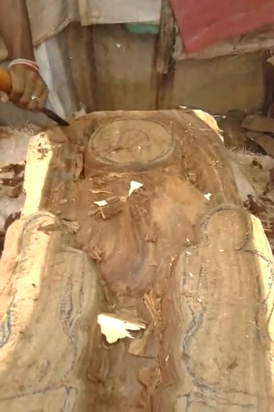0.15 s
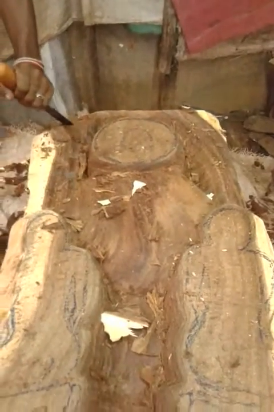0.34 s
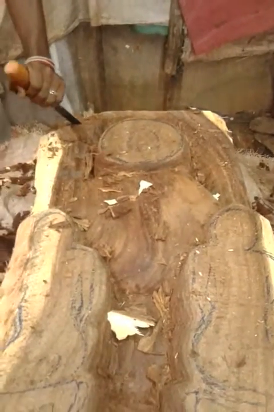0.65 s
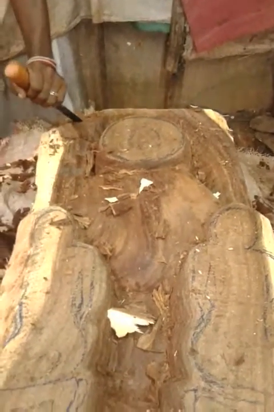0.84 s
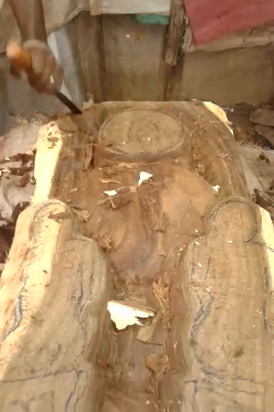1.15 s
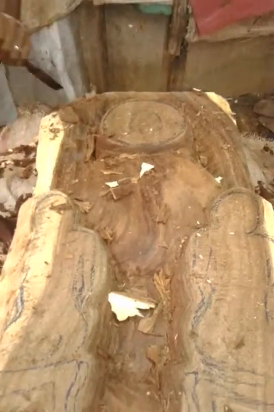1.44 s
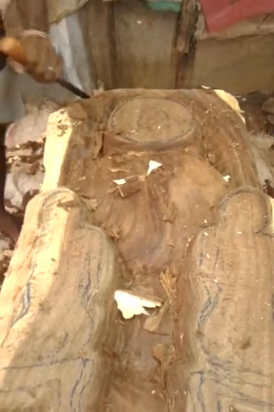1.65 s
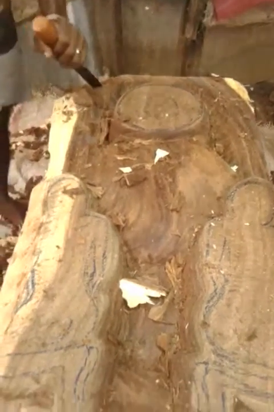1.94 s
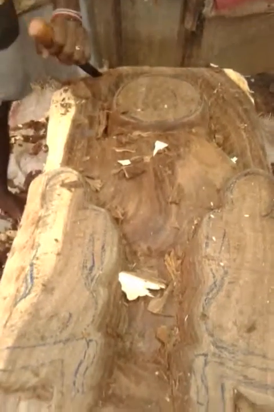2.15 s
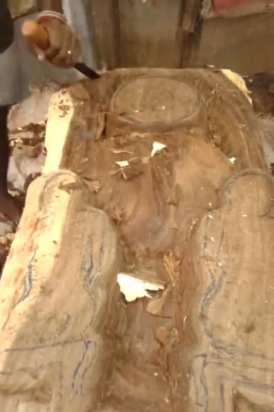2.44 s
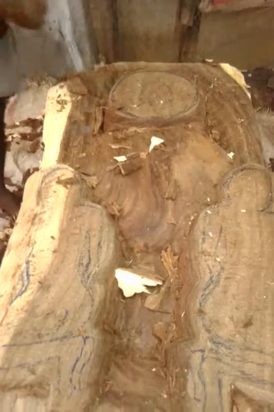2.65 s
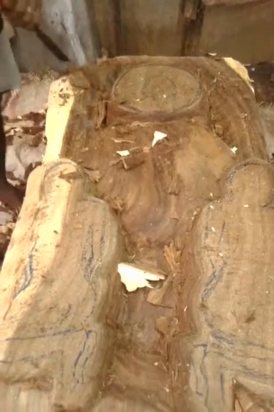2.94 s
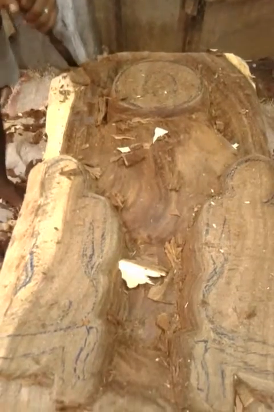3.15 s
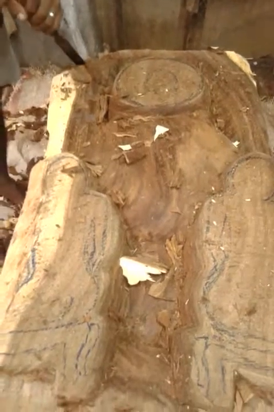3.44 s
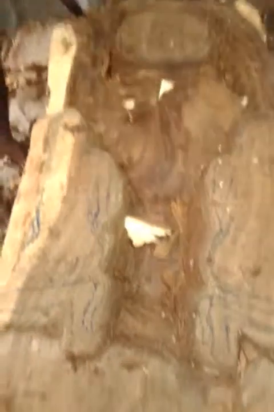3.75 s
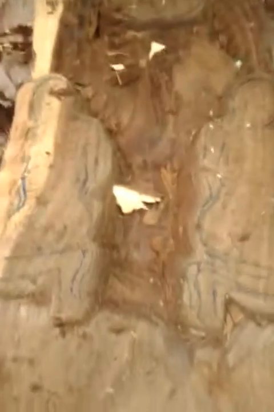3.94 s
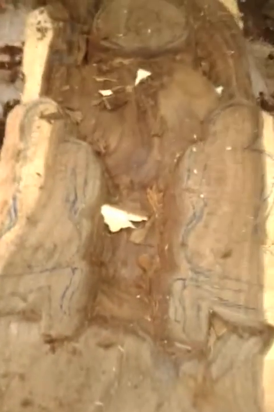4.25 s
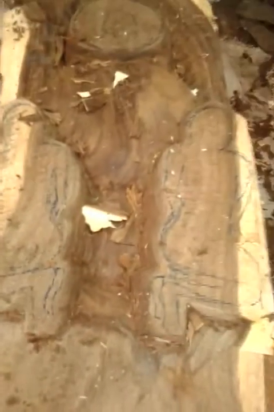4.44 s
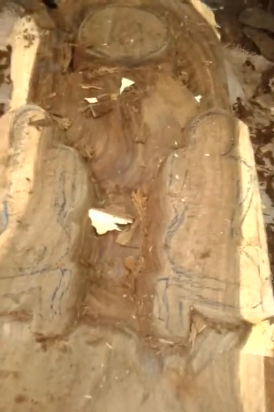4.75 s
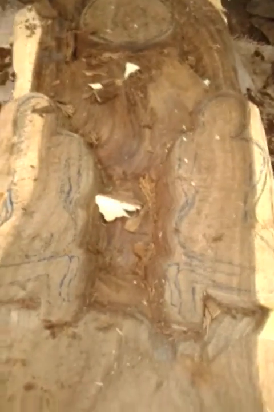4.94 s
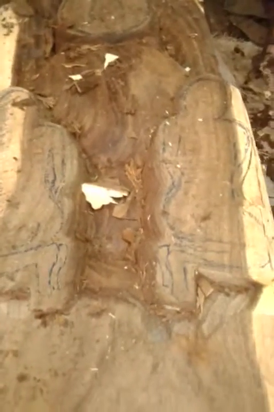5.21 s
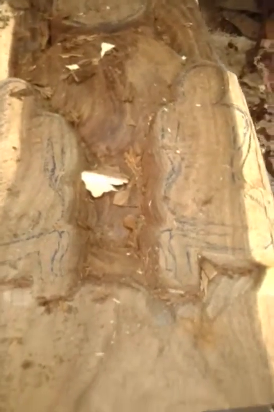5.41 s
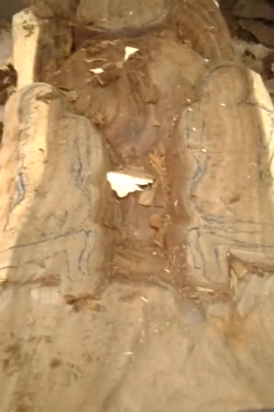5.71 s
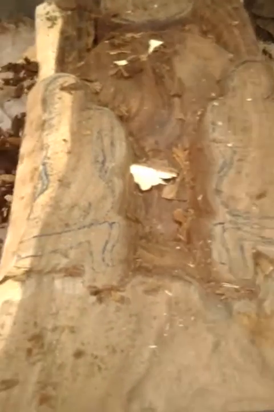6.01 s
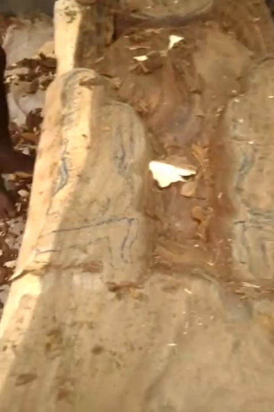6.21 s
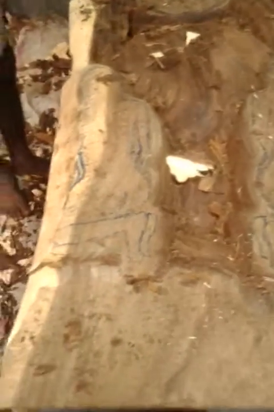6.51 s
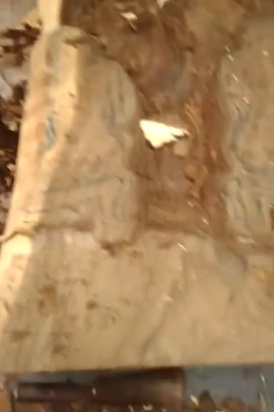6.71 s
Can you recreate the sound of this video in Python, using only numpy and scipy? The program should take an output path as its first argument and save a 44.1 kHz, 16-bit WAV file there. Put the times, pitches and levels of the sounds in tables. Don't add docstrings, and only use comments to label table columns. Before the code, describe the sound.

In a small plank shed, a mallet drives a chisel into a large log, picked up in mono by a phone a couple of metres away. Loud sharp knocks land at about 0.2, 0.7, 1.2, 2.1, 2.6, 3.5, 3.9, 4.4, 5.1, 5.6, 6.4 and 6.8 seconds, each different: cracking fibres, short woody log ring, bright brief blade ring, soft floor thump and a quick boxy echo. Debris settles after each. A double chip tap comes near 0.57, a firm bright chisel tap at 1.39, and a knocked steel tool rings thinly from 2.97 for half a second. Elsewhere faint chips drop, splinters tick, shavings rustle and wood squeaks softly, notably around 3.2 and 6.1. A distant motor wavers very low underneath, almost hidden. The last blows are duller, and the final one is still fading as it ends near 6.9.

```python
import sys
import numpy as np
from scipy import signal
from scipy.fft import rfft, irfft
from scipy.io import wavfile
from scipy.ndimage import uniform_filter1d, minimum_filter1d

SR = 44100
rng = np.random.default_rng(int(sys.argv[2]) if len(sys.argv) > 2 else 0)


def boost(x):
    u = np.asarray(x, float) / 20
    return 10 ** u


def to_wav(sig):
    pcm = np.clip(np.atleast_2d(sig), -1, 1) * 32767
    pcm = np.round(pcm).astype(np.int16)
    wavfile.write(sys.argv[1], SR, pcm.T)


N = 302967
SIZE = 16384
SHORT_HZ = np.arange(SIZE // 2 + 1) * SR / SIZE


def shape(points, hz):
    points = np.array(points)
    return np.interp(np.log(hz + 1), np.log(points[:, 0]), points[:, 1])


def causal(db):
    c = irfft(np.log(boost(db)))
    c[1:SIZE // 2] *= 2
    c[SIZE // 2 + 1:] = 0
    return np.exp(rfft(c))


def fade(t60):
    return np.exp(-np.log(1000) * np.arange(SIZE) / SR / np.clip(t60, .01, 8))


def ring(hz, t60):
    return np.sin(2 * np.pi * hz * np.arange(SIZE) / SR) * fade(t60)


def add(out, s, sound):
    i = int(s * SR)
    out[i:i + SIZE] += sound[:N - i]


def smooth(x, size):
    return uniform_filter1d(uniform_filter1d(x, size), size)


def walk(rate):
    k = int(SR / rate)
    w = smooth(np.repeat(rng.standard_normal(N // k + 1), k), k)[:N]
    return w / w.std()


def knock(colour_db, t60, burst_s, wet_db, walls):
    far_wall_s, far_wall_share = 0.026, 0.37
    late_t60_s, late_db = 0.32, -29
    clump_db, ripple_db = 1.47, 1.8
    t = np.arange(SIZE) / SR
    chance = rng.standard_normal((4, SIZE))
    burst = chance[0] * boost(2.0 * chance[1]) * np.exp(-(t / burst_s) ** 2) * (1 - np.exp(-t / 0.00019))
    swell = (1 - np.exp(-t / 0.00059)) * (1 + far_wall_share * np.clip(t / far_wall_s, 0, 1))
    decay = fade(t60) + boost(late_db) * fade(late_t60_s)
    echoes = (0.3 * walls + 0.7 * chance[2]) * swell * decay
    clumps = smooth(chance[1], 220)
    echoes = echoes * boost(clump_db * clumps / clumps.std())
    ripple = smooth(chance[3, :SIZE // 2 + 1], 45)
    colour = causal(colour_db + ripple_db * ripple / ripple.std())
    sound = irfft(rfft(burst + boost(wet_db) * echoes) * colour)
    return sound / np.sqrt(np.mean(sound[:SR // 100] ** 2))


def lift(rings, hz):
    lift_db, width_hz = 3, 90
    return sum(lift_db * boost(1.1 * db) / (1 + ((hz - f) / (width_hz + 0.004 * f)) ** 2) for f, db in rings)


# pitch in Hz, level in dB, time to die away by 60 dB in seconds.
LOG_RINGS = [(149, -28.5, 0.18), (214, -15.5, 0.4), (286, -13, 0.6), (545, -16.5, 0.13), (1235, -10.5, .3),
             (1890, -11, 0.16)]


def log_ring(trim, knock_db, woken):
    wood_t60_s, woken_t60_s = .13, 0.075
    wood = np.zeros(SIZE)
    for hz, db, t60 in LOG_RINGS:
        spot, drift = rng.standard_normal(2)
        level = boost(db + shape(trim, hz) + 2 * spot) * np.sign(drift)
        note = ring(hz * (1 + 0.0032 * drift), min(t60, wood_t60_s + 20 / hz))
        wood += level * note * (1 - fade(25.0 / hz))
    extra = sum(boost(db + 0.25 * knock_db - 1.0) * ring(hz, woken_t60_s) for hz, db in woken)
    wood = wood + extra * (1 - fade(.003))
    push = np.hanning(24) / 12
    return np.convolve(wood, push)[:SIZE]


# start in seconds, peak in dB, then boom and knock in dB against the usual blow.
BLOWS = [(0.194, 1.5, 1.5, -0.5), (0.71, 1, 2, 2.5), (1.237, 2, 0.5, 1.5), (2.144, -0.5, 2, -0.7),
         (2.646, -4, 3, 0.5), (3.492, -3, 5.5, 0.5), (3.927, -0.5, -7, -1), (4.381, -1.5, 7, 2.5),
         (5.147, -3, 1, 2.5), (5.571, -1.5, 0, 1.5), (6.431, -2, -6, 8), (6.787, -5, 3.5, 1)]
# crack, handle thud and floor thump, all in dB against the usual blow.
LANDINGS = [(4, -1, -0.5), (1, 1.5, -1.5), (1, -3, 3.5), (3, -10, -8), (-4.5, -11, -13.5), (-2, -0.5, 3.5),
            (-1.5, 2.5, 6.5), (3.5, -2.5, 15.5), (-3, 2.5, 4.5), (1, -3, -8), (-4.5, -2, -4),
            (-7.5, -1.5, -10.5)]
# pitch in Hz, level in dB.
WOKEN_RINGS = [
    [(802, -1.5), (1232, 0.5), (1480, -15), (1625, -9), (1765, -3), (1911, 0), (2072, -6)],
    [(807, 1.5), (1222, -9), (1410, 5), (1620, -9), (1857, -5), (2088, 3.5), (2260, -7)],
    [(656, -5), (807, -2), (1394, -5.5), (1555, -10.5), (1690, -2.5), (2153, 3), (2433, 1.5)],
    [(899, -4.5), (1222, 1), (1388, -9.5), (1760, 4.5), (1905, 4.5), (2094, -7.5), (2740, 7)],
    [(1055, 3.5), (1227, 8), (1426, 4.5), (1598, -15), (1776, -2), (1916, 6), (2147, 7)],
    [(527, -6), (737, -9), (1222, 6.5), (1372, 0.5), (1620, 7), (1824, -7), (1970, 4.5)],
    [(538, -6.5), (802, 0.5), (1227, 0), (1421, 0), (1614, -6.5), (1916, -0.5), (2067, -5.5)],
    [(527, -10), (656, -14), (802, -5), (1222, -3), (1507, 3), (1760, 5), (2072, -6.5)],
    [(527, -3.5), (807, 4), (1281, -11.5), (1437, -15), (1582, -0.5), (1776, -5.5), (2147, 8.5)],
    [(818, 4.5), (995, -0.5), (1426, -7), (1577, -3), (1717, -21), (1921, -2.5), (2072, 5.5)],
    [(672, -5.5), (818, -11), (1022, 10), (1173, -9), (1324, -21), (1453, -8), (2767, 7.5)],
    [(645, -14.5), (812, -27), (1022, 11), (1173, -12), (1318, -0.5), (1582, 7), (1717, -16)],
]
# pitch in Hz, level in dB.
BLADE_RINGS = [
    [(3025, -1.5), (3999, 3), (4521, -6.5), (4780, 0.5), (5092, -8)],
    [(3052, -8), (3649, 3), (3994, 1.5), (4591, -13), (5141, -2.5)],
    [(3111, -2), (3881, 2.5), (4559, -9), (4796, -4.5), (5577, 3)],
    [(3079, -3.5), (4172, 7), (4457, -2.5), (4726, -12.5), (5431, -8.5)],
    [(3197, 5.5), (3547, 9.5), (4468, -31.5), (4839, -22), (5415, 6.5)],
    [(3423, -2.5), (4834, 2), (5135, -1), (5431, 6), (5673, -9.5)],
    [(3520, 1.5), (3924, -3), (4473, -4.5), (4764, 1.5), (5329, -3)],
    [(3628, -5.5), (4543, -4.5), (4769, -12), (5011, -4), (5442, 0)],
    [(3628, 1), (4554, 11), (4974, -19), (5281, 8), (5819, 10.5)],
    [(3617, 2.5), (4177, 5.5), (4974, -1), (5426, 0), (5776, -11)],
    [(3111, -17), (3859, -4.5), (4748, -16), (5081, 0), (5426, 4.5)],
    [(3203, -13), (3450, 3), (3698, 7.5), (4015, 5), (5227, 1)],
]
LINGERING = [1.076, 1, 1.015, 0.93, 0.87, 1.03, 0.97, 1.03, 0.93, 0.98, 0.81, 0.75]
SIZZLE = [1.9, -2.1, 2.5, 1.7, 2.5, -1, -0.8, -3.5, 0, 1.7, 2, 0]
# pitch in Hz, level in dB per Hz.
WOOD_COLOUR = [(35, -50.5), (60, -37.5), (233, -16), (368, -10.5), (442, -12), (610, -11), (861, -8.5),
               (1060, -13.5), (1390, -7), (2110, -10), (3340, -14), (4930, -8), (6800, -21), (12900, -40.5),
               (14500, -57.5)]


def blows(walls):
    shed_t60_s, blade_t60_s, blade_late_s = 0.14, 0.036, .0007
    splinter_per_crack = 0.47
    contact = boost(-9) * ring(1450, .006)
    swing = ring(377, 0.14) * (1 - fade(0.14))
    out = np.zeros(N)
    each_blow = zip(BLOWS, LANDINGS, WOKEN_RINGS, BLADE_RINGS, LINGERING, SIZZLE)
    for (s, peak_db, boom_db, knock_db), (crack_db, thud_db, _), woken, blade, lingering, sizzle_db in each_blow:
        splinter_db = splinter_per_crack * crack_db + sizzle_db
        trim = [(240, thud_db), (380, boom_db), (950, knock_db), (2000, 0), (4800, crack_db), (9000, splinter_db)]
        colour = shape(WOOD_COLOUR, SHORT_HZ) + shape(trim, SHORT_HZ)
        colour = colour + lift(list(woken) + list(blade), SHORT_HZ)
        crack = knock(colour, shed_t60_s * lingering, 0.0022, -5.0, walls)
        wood = log_ring(trim, knock_db, woken)
        boom = boost(boom_db - 16.5) * swing
        chisel = np.zeros(SIZE)
        for k, (hz, db) in enumerate(blade):
            chisel += (-1) ** k * boost(crack_db + db - 16.5) * ring(hz, blade_t60_s)
        add(out, s + .0008, boost(peak_db) * (contact + boost(-17.0) * wood + boom))
        add(out, s + .0008 + blade_late_s, boost(peak_db) * (chisel + boost(-13.0) * crack))
    return out


# pitch in Hz, level in dB, time to die away by 60 dB in seconds.
FLOOR_RINGS = [(42, -64.5, 0.32), (84, -57, 0.18), (153, -46.5, 0.14), (190, -49.5, 0.27)]


def ground():
    out = np.zeros(N)
    for (s, peak_db, *_), (*_, thump_db) in zip(BLOWS, LANDINGS):
        for hz, db, t60 in FLOOR_RINGS:
            add(out, s, boost(peak_db + thump_db + db) * ring(hz, t60) * (1 - fade(.06)))
    return out


# start in seconds, peak in dB, brightness in dB, ring in Hz.
TAPS = [(.106, -43.5, -3.5, 1340), (0.34, -46, -3, 440), (0.542, -42.5, 3, 1900), (0.901, -38, 3, 483),
        (1.005, -39.5, 2.5, 2260), (1.386, -17.5, 8, 2360), (1.549, -41.5, 16, 1415), (1.688, -39, 0, 1800),
        (3.178, -48.5, -12, 587), (3.878, -50, 3.5, 1500), (4.192, -38.5, 9.5, 1684),
        (4.295, -38.5, -1.5, 1590), (4.552, -42.5, -12.5, 316), (4.657, -30, 10.5, 2093),
        (5.05, -46, 14, 1850), (5.799, -33, 14, 2096), (6.375, -42, 9.5, 920)]
# start in seconds, peak in dB, brightness in dB, ring in Hz.
DROPS = [(.169, -44, 8, 1560), (.375, -33.5, 0.5, 1500), (.564, -23.5, 6, 443), (.578, -20, 4, 1990),
         (1.16, -44.5, 6, 1560), (1.455, -32.5, -2.5, 808), (1.587, -38, -5.5, 1360), (1.86, -35, -10, 818),
         (1.879, -34.5, -3, 377), (1.978, -48.5, 7, 872), (2.493, -38.5, 1.5, 1030), (3.195, -40, 4, 1390),
         (3.345, -52, -1, 379), (3.618, -34.5, 2, 1403), (3.818, -43, -3, 478), (4.104, -32, 0, 1887),
         (4.135, -33, 3, 320), (4.718, -45.5, -2, 632), (4.756, -51.5, -14, 375), (4.933, -51, 11, 421),
         (5.354, -34, -0.5, 946), (5.428, -43.5, -3, 1900), (5.516, -47, 15, 386), (5.973, -47.5, 13, 2070),
         (6.118, -46, -9, 653), (6.575, -41, -10, 313), (6.6, -44, -7.5, 337)]
# start in seconds, peak in dB, brightness in dB, ring in Hz.
SPLINTERS = [(.474, -48.5, 9.5, 1330), (.878, -40, -3, 420), (.956, -43.5, 10, 1850),
             (1.095, -44, 17, 2250), (1.342, -32, 25, 296), (1.381, -63, 8.5, 2394),
             (2.044, -43.5, 7.5, 1910), (2.076, -38.5, 6.5, 301), (2.336, -45.5, -0.5, 1960),
             (2.823, -53.5, 4, 560), (2.85, -47.5, -3, 582), (2.964, -29, 18.5, 1185),
             (3.209, -43.5, -9, 377), (3.674, -34.5, -3, 312), (4.518, -42.5, -9.5, 351),
             (4.599, -50.5, 15.5, 317), (4.846, -50.5, -2.5, 301.5), (4.959, -41.5, 19.5, 2363),
             (5.009, -49, -13, 377), (5.262, -49.5, 22, 2430), (5.273, -48, 9, 2450),
             (5.324, -47.5, 26, 2400), (5.487, -48, 1.5, 2420), (5.774, -44, -1, 329),
             (6.058, -47.5, 1.5, 853), (6.162, -43, -6, 785), (6.179, -43.5, -2, 877),
             (6.716, -52, 3.5, 319)]


def chips(walls):
    wet_db, note_db = -3, -7.5
    note_t60_s, note_cycles = .14, 110
    out = np.zeros(N)
    for table, mid_db in ((TAPS, 5.5), (DROPS, -0.5), (SPLINTERS, -10)):
        for s, peak_db, bright_db, ring_hz in table:
            trim = [(500, 3.5 - bright_db), (1700, mid_db), (4800, 1.5 + bright_db)]
            t60 = 0.094 + 0.00031 * (peak_db + 48.5)
            note = ring(ring_hz, min(note_t60_s, note_cycles / ring_hz)) * (1 - fade(.012))
            note = note * boost(shape(trim, ring_hz) + note_db)
            colour = shape(WOOD_COLOUR, SHORT_HZ) + shape(trim, SHORT_HZ)
            tap = knock(colour, t60, 0.00047, wet_db, walls)
            add(out, s + 0.00021, boost(peak_db - 12.0) * (tap + note))
    return out


# start in seconds, level in dB, time to die away by 60 dB in seconds.
FIRM_TAPS = [(.5655, -30, 0.045), (1.3875, -27.5, 0.028), (5.354, -46, 0.028), (2.965, -47, 0.05),
             (1.3425, -36, 0.028)]
# pitch in Hz, level in dB.
FIRM_RINGS = [
    [(448, -4.5), (4295, -15), (4758, 6.5), (5097, 3), (5474, 2)],
    [(2374, -1), (4026, -2), (4780, -7), (5076, 0), (5367, 1)],
    [(2013, -1), (2460, -1), (3531, 0), (4376, 0), (5200, 0)],
    [(1950, -9), (4215, -7), (4952, -3), (5329, 6), (5706, -8)],
    [(4900, 0), (5250, -3), (5600, 7), (5950, 1)],
]


def hard_taps():
    out = np.zeros(N)
    for (s, tap_db, t60), rings in zip(FIRM_TAPS, FIRM_RINGS):
        for k, (hz, db) in enumerate(rings):
            add(out, s, (-1) ** k * boost(tap_db + db) * ring(hz, t60))
    return out


# pitch in Hz, level in dB, time to die away by 60 dB in seconds.
STEEL_RINGS = [(1233, -8, .45), (1836, -18, 3.0), (1922, -23, 2.0), (4113, -6, .1), (4904, -13, .8),
               (5270, -5, .15), (5370, -9, .5), (5415, -2, .7), (5706, -6, .13)]


def steel():
    knock_s, level_db = 2.965, -49
    t = np.arange(N) / SR - knock_s
    held = (t > 0) * np.clip((.52 - t) / 0.083, 0, 1)
    out = np.zeros(N)
    for hz, db, t60 in STEEL_RINGS:
        flutter = boost(level_db + db + hz / 4000 * walk(45))
        out += flutter * np.sin(2 * np.pi * hz * t) * boost(-60 * np.abs(t) / t60) * held
    return out


# start in seconds, level in dB, ring in Hz.
SNAPS = [(.3245, -54, 5600), (.3245, -62, 9000), (.34, -56, 5050), (2.8255, -57, 4500), (2.8255, -58, 5600),
         (3.364, -70, 9300), (3.364, -70, 10100), (1.343, -55, 10300), (1.343, -57, 11000),
         (4.602, -56, 6000), (4.891, -59, 4800), (4.891, -62, 6300), (4.934, -55, 5000), (4.177, -54, 5000),
         (3.6205, -48, 5200), (3.677, -50, 5100), (4.657, -44, 6600), (6.11, -64, 8700), (5.8, -48, 5000),
         (3.1965, -57, 5400), (1.457, -48, 5300), (6.169, -62, 7500)]


def ticks():
    out = np.zeros(N)
    for s, db, hz in SNAPS:
        rough = 1 + .5 * uniform_filter1d(rng.standard_normal(SIZE), size=12)
        add(out, s, boost(db) * ring(hz, .018) * rough)
    return out


# start in #
# seconds, length in seconds, pitch in Hz, level in dB.
SQUEAKS = [(1.17, .07, 1550, -60), (1.15, .09, 2280, -63), (1.712, .11, 650, -69), (2.88, .031, 640, -60),
           (3.18, .05, 156, -66), (4.715, .025, 700, -62), (4.75, .03, 787, -63), (4.994, .027, 800, -66),
           (5.0, .072, 377, -66), (6.11, .03, 660, -58), (6.163, .055, 815, -53), (2.83, .13, 578, -62),
           (3.26, .22, 210, -67), (3.246, .21, 368, -69), (3.288, .089, 587, -70), (3.357, .14, 290, -70),
           (3.73, .16, 453, -63), (5.851, .14, 460, -74), (6.203, .05, 1095, -65), (6.145, .12, 375, -62),
           (5.425, .085, 5400, -63), (5.43, .07, 2060, -65), (5.66, .09, 5200, -67),
           (6.112, .027, 1200, -64), (3.205, .028, 824, -62), (5.43, .07, 3800, -72),
           (3.72, .09, 5150, -67), (3.18, .015, 500, -56), (1.095, .05, 5150, -60), (4.02, .07, 5350, -60)]


def squeaks():
    out, t = np.zeros(N), np.arange(N) / SR
    for s, length, hz, db in SQUEAKS:
        swell = np.sin(np.pi * np.clip((t - s) / length, 0, 1))
        husk = .55 * min(hz / 2500, 1)
        breaking = 1 + husk * (walk(40 + hz / 25) - 1)
        out += boost(db) * swell * breaking * np.sin(2 * np.pi * hz * t)
    return out


# start in seconds, length in seconds, level in dB, brightness in dB.
SCRAPES = [(-.06, 0.11, -74, 9), (0.198, 0.1, -77, 5), (0.58, 0.086, -59, 0.5), (0.805, 0.73, -70.5, 4.5),
           (1.276, 0.26, -80, -11), (1.695, 0.38, -78, -0.5), (2.253, 0.12, -77.5, -4),
           (2.51, 0.33, -87, 9), (2.826, 0.11, -76, 12.5), (2.938, 0.13, -69, 7), (3.018, 0.1, -83, 11),
           (3.166, 0.1, -77.5, 1), (3.297, 0.1, -87, 3), (3.55, 0.32, -66.5, -5), (3.766, 0.17, -69.5, 1),
           (3.956, 0.18, -61, -5), (4.082, 0.54, -70, 2), (4.636, 0.19, -73.5, -3),
           (4.914, 0.14, -89.5, 0.5), (5.195, 0.23, -76, -13), (5.616, 0.29, -72.5, -1),
           (5.763, 0.25, -74, 1.5), (6.05, 0.093, -80, 5.5), (6.132, 0.53, -72.5, 9.5),
           (6.492, 0.83, -80, 3), (6.8, 0.18, -68.5, 12)]
# start in seconds, length in seconds, level in dB, brightness in dB, hiss in dB.
DRAGS = [(0.588, .11, -68.5, 0, -19), (1.34, .012, -72, 11, 7), (2.842, .11, -73.5, 6.5, 9),
         (2.957, 0.045, -68.5, 11.5, 1), (3.192, 0.078, -83.5, 5, 11), (3.692, 0.028, -76.5, 1, 5),
         (3.808, 0.034, -82, 2, 17), (4.105, 0.093, -77, 8, -7), (5.318, 0.019, -84.5, 7, 16),
         (5.511, 0.061, -79.5, 18.5, -13), (6.055, 0.041, -78, 4, 2), (6.503, 0.053, -67.5, -11, 1),
         (6.131, 0.32, -87, 6, -12)]
# pitch in Hz, dB per third of an octave against the level of its range.
RUSTLE_COLOUR = [(100, -24.5), (200, -9.5), (400, -8), (800, -9.5), (1300, -8.5), (2000, -5.5), (2500, -12),
                 (3200, -11), (4000, -6.5), (5000, 1), (6300, -13), (8000, -13.5), (10000, -16),
                 (13000, -16)]


def rustle():
    still_db, still_bright_db = -77.5, -2.5
    settle_db, settle_bright_db, settle_delay_s, settle_t60_s = -56, -9, 0.035, 0.36
    t = np.arange(0, N + 64, 64) / SR
    hz = np.arange(N // 2 + 1) * SR / N
    s, length, db, bright_db = np.array(SCRAPES).T[:, :, None]
    swells = np.sin(np.pi * np.clip((t - s) / length, 0, 1)) * boost(db)
    at, span, drag_db, drag_bright_db, hiss_db = np.array(DRAGS).T[:, :, None]
    start = np.clip((t - at) / 0.0031, 0, 1)
    end = np.clip(1 - (t - at - span) / 0.026, 0, 1) ** 2
    drags = start * end * boost(drag_db)
    since = t - np.array(BLOWS)[:, :1] - settle_delay_s
    fall_db = settle_db + np.array(BLOWS)[:, 1:2] - 60 * np.abs(since) / settle_t60_s
    settle = np.sum((since > 0) * boost(fall_db), axis=0)
    shared = 1.5 * walk(14)
    grain = rfft(rng.standard_normal(N) * boost(2 * rng.standard_normal(N) + 2 * walk(150)))
    out = np.zeros(N)
    for centre in 100 * 2 ** np.arange(0, 7.3, 1 / 3):
        band = irfft(grain * np.clip(1 - 3 * np.abs(np.log2((hz + 1) / centre)), 0, 1), N)
        tip = np.interp(np.log(centre), np.log([450, 4800]), [-1, 1])
        scrape_db = tip * bright_db - 8.9 * (centre < 330) - 2.7 * (centre > 7000)
        blade_db = tip * drag_bright_db - 8 * (centre < 330) + hiss_db * (centre > 6500)
        gain = boost(still_db + tip * still_bright_db) + settle * boost(tip * settle_bright_db)
        gain = gain + np.sum(swells * boost(scrape_db), axis=0) + np.sum(drags * boost(blade_db), axis=0)
        flicker = shared + (3.4 if centre < 1500 else 1.6) * walk(11)
        level = np.interp(np.arange(N) / SR, t, gain)
        out += band / band.std() * level * boost(shape(RUSTLE_COLOUR, centre) + flicker)
    return out


def low_noise(order, band_hz):
    sos = signal.butter(order, band_hz, "band", fs=SR, output="sos")
    return signal.sosfilt(sos, rng.standard_normal(N))


# time in seconds, pitch in Hz, level in dB.
MOTOR = [(0, 84, -72), (.5, 84, -85), (1.3, 83.6, -68.5), (1.85, 84.8, -79), (2.1, 69.6, -76),
         (2.55, 70.4, -88.5), (2.72, 67.7, -63), (3.1, 66.3, -71.5), (3.35, 68.2, -87.5),
         (3.6, 68.3, -70.5), (3.801, 70.15, -60.5), (4.3, 69.7, -77), (4.75, 77.4, -72), (5.3, 70.4, -70),
         (5.95, 78.5, -75), (6.12, 78.2, -61), (6.349, 80, -78.5), (6.87, 83.6, -62)]


def hum():
    s, hz, db = np.transpose(MOTOR)
    t = np.arange(N) / SR
    pitch = np.interp(t, s, hz) * (1 + 0.045 * walk(22))
    tone = np.sqrt(2) * np.sin(2 * np.pi * np.cumsum(pitch) / SR)
    level = boost(np.interp(t, s, db) + 2.2 * walk(7.3))
    return tone * level + boost(-49) * low_noise(3, [52, 100]) + boost(-53) * low_noise(2, [40, 56])


def scene():
    walls = rng.standard_normal(SIZE)
    wood = blows(walls) + chips(walls) + hard_taps()
    wood = signal.sosfilt(signal.butter(2, 170, "high", fs=SR, output="sos"), wood)
    return (wood + ground() + steel() + ticks() + squeaks() + rustle() + hum())[None, :]


def band_limit(x):
    return signal.sosfilt(signal.butter(12, 14900, fs=SR, output="sos"), x)


def record(dry):
    brace_s, brace_db, top_hz = .009, -7, 14100
    now = uniform_filter1d(np.abs(dry), size=64) + 1e-9
    reach = int(brace_s * SR)
    ahead = -minimum_filter1d(-now, size=reach, origin=-(reach // 2))
    brace = uniform_filter1d(np.clip(np.log10(ahead / now) - 1.5, 0, .5) * 2, size=32)
    rounded = np.tanh(1.25 * dry * boost(brace_db * brace)) / 1.4
    treble_cut = signal.ellip(8, .2, 55, top_hz, fs=SR, output="sos")
    bass_cut = signal.butter(2, 38, "high", fs=SR, output="sos")
    mix = signal.sosfilt(np.vstack([treble_cut, bass_cut]), rounded)
    return band_limit(mix)


dry = scene()
out = record(dry)
to_wav(out)
```